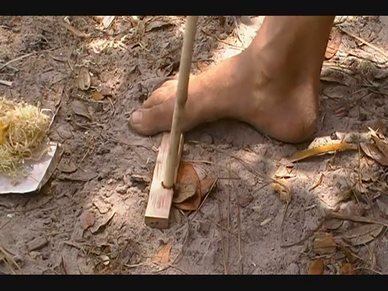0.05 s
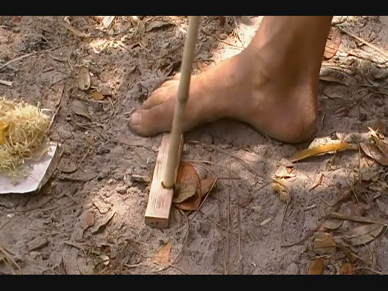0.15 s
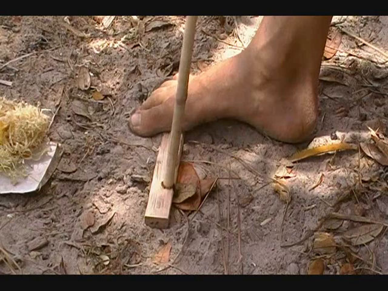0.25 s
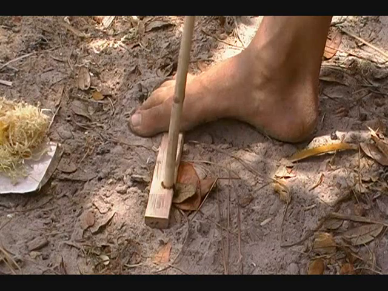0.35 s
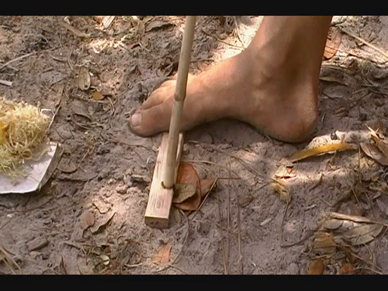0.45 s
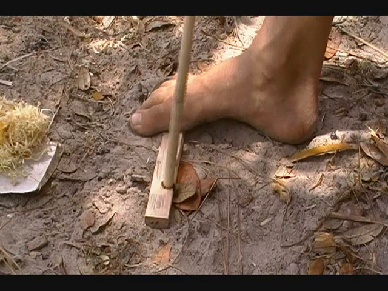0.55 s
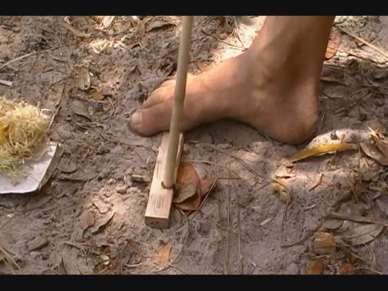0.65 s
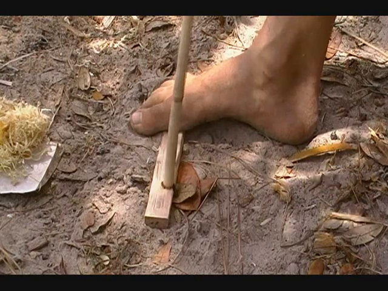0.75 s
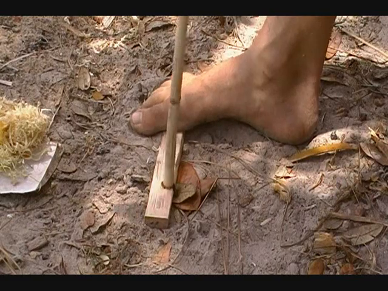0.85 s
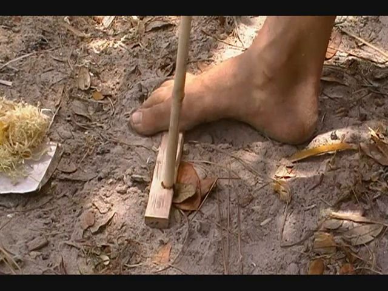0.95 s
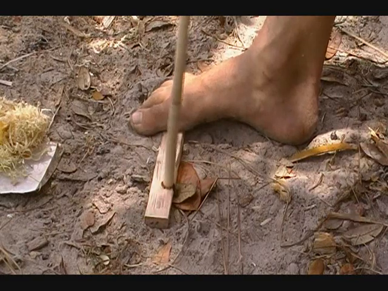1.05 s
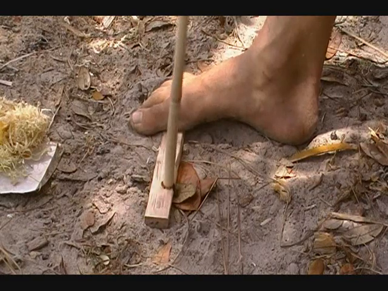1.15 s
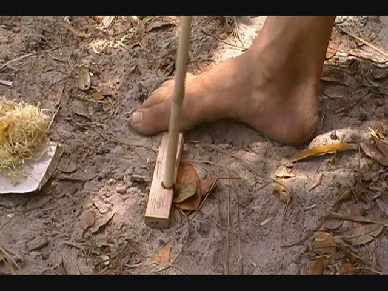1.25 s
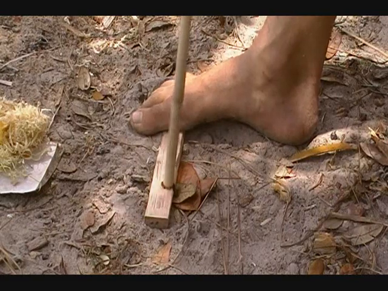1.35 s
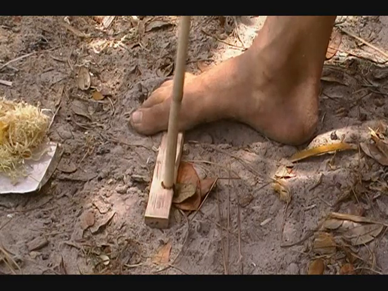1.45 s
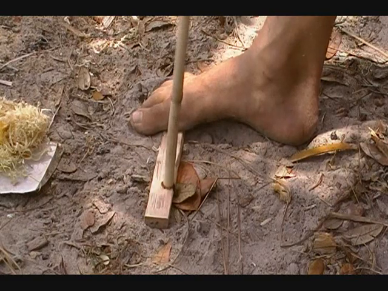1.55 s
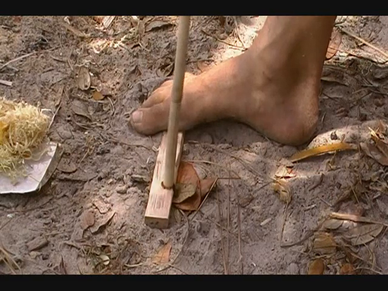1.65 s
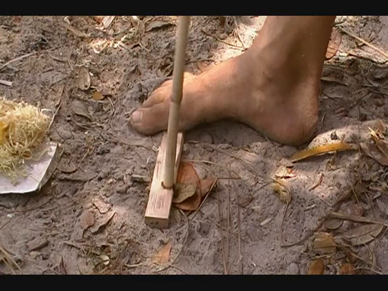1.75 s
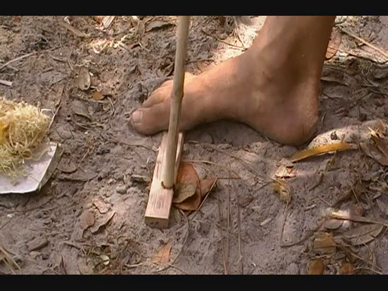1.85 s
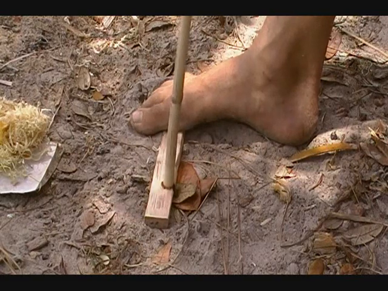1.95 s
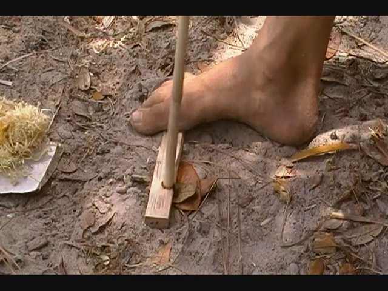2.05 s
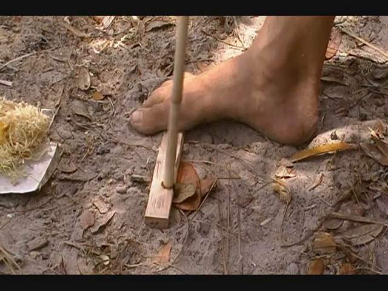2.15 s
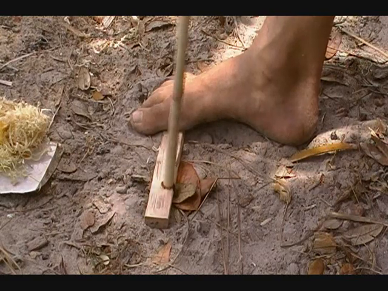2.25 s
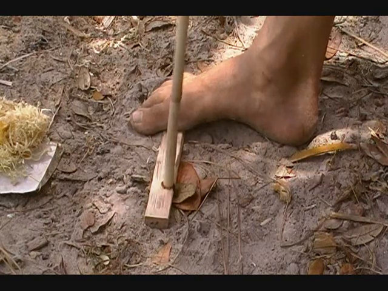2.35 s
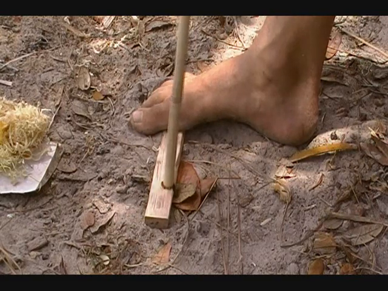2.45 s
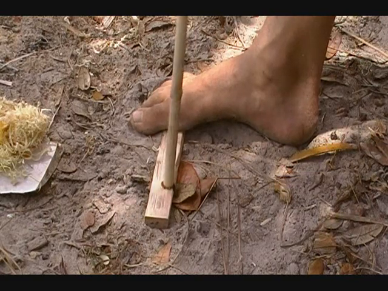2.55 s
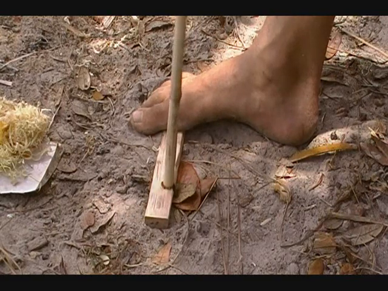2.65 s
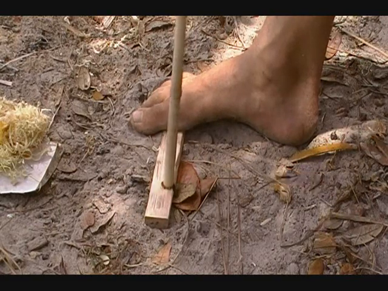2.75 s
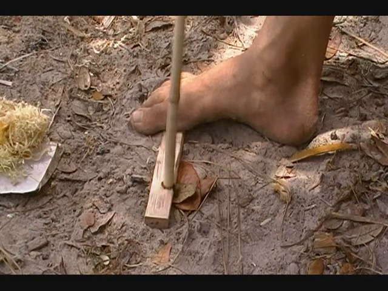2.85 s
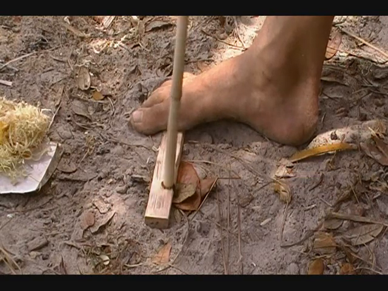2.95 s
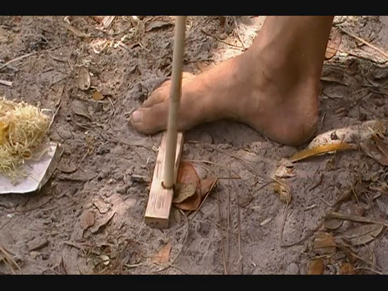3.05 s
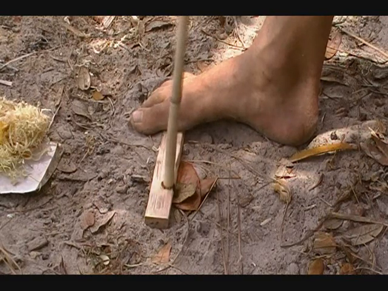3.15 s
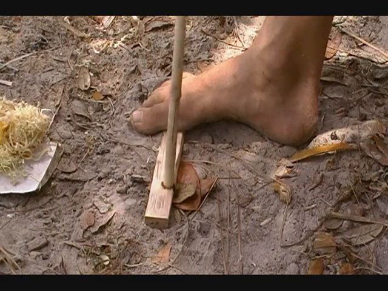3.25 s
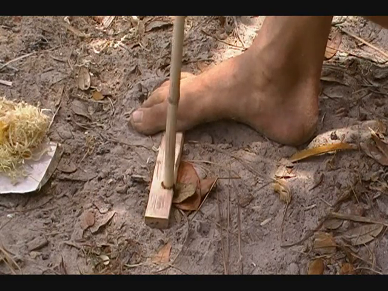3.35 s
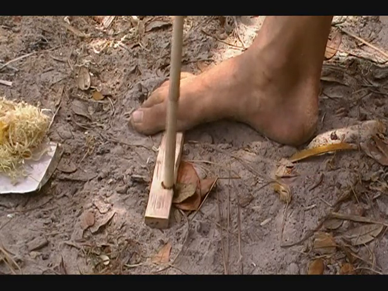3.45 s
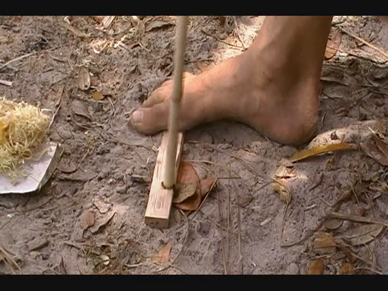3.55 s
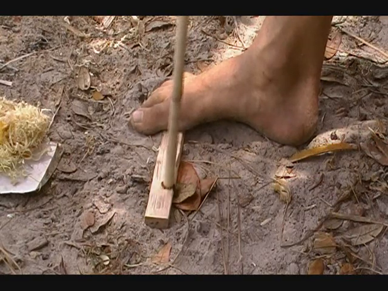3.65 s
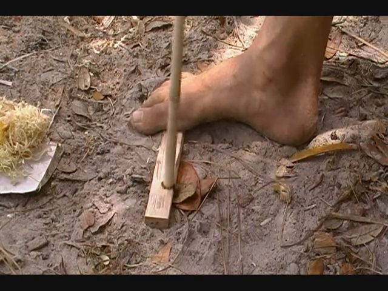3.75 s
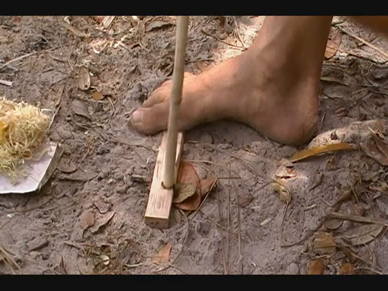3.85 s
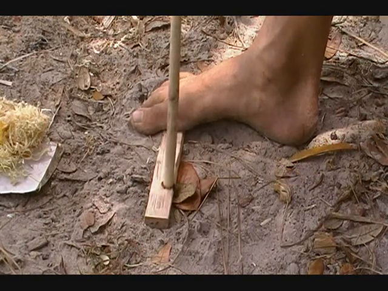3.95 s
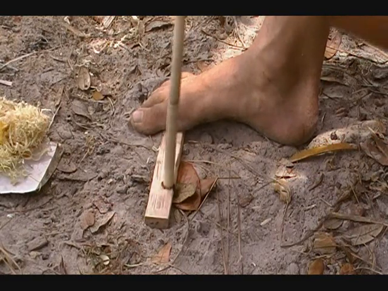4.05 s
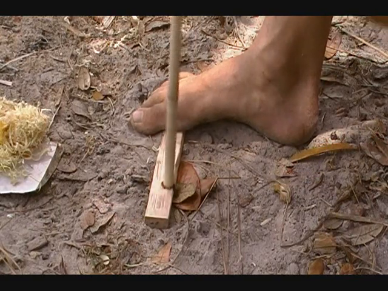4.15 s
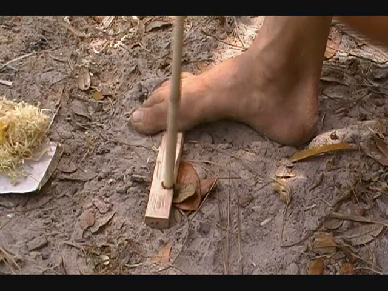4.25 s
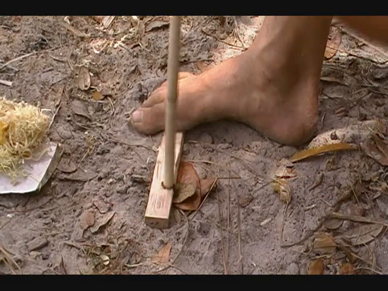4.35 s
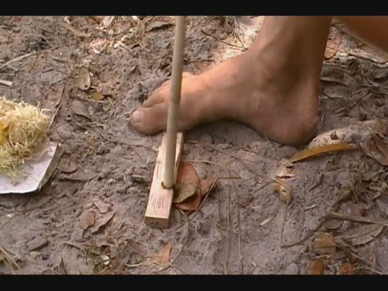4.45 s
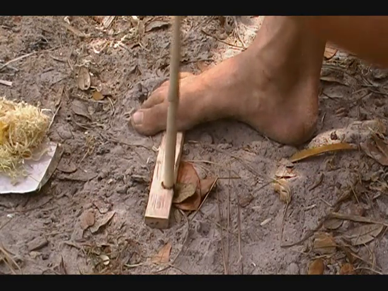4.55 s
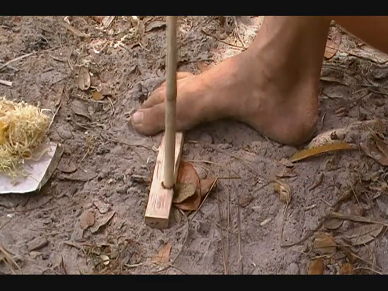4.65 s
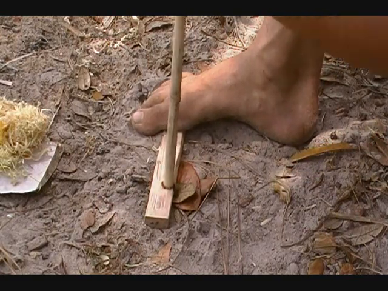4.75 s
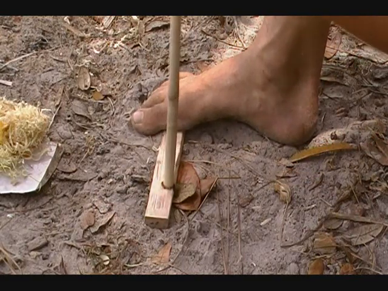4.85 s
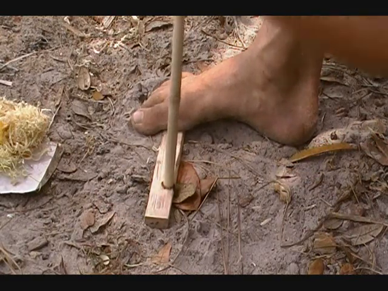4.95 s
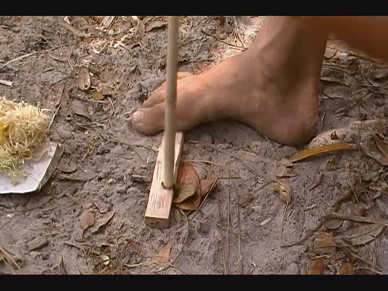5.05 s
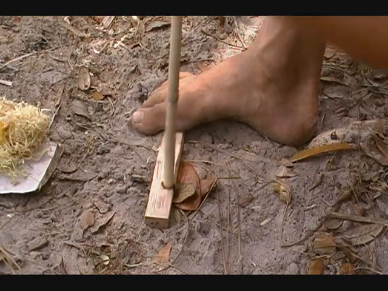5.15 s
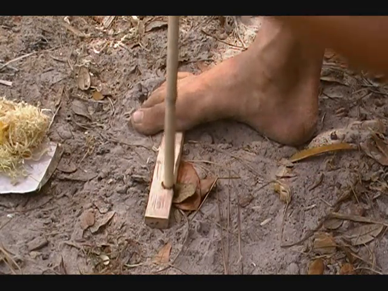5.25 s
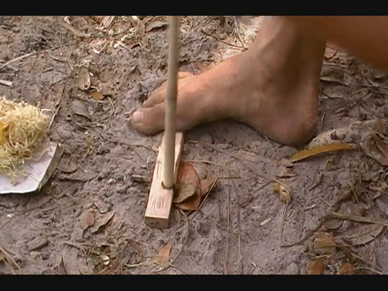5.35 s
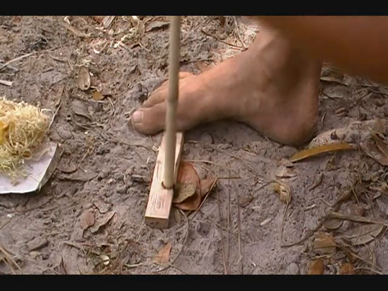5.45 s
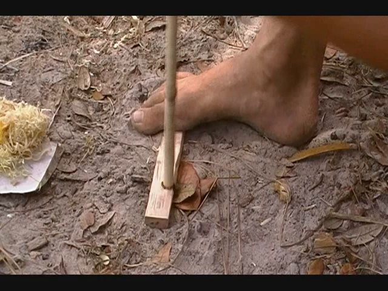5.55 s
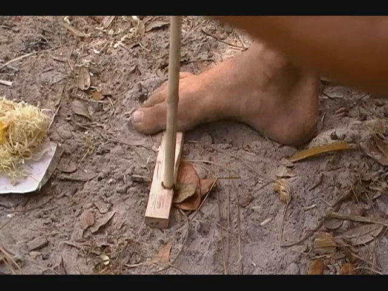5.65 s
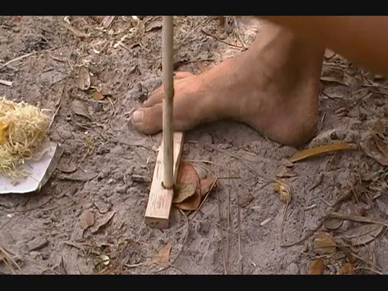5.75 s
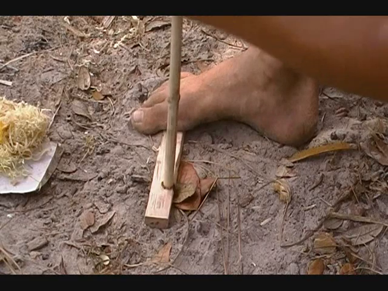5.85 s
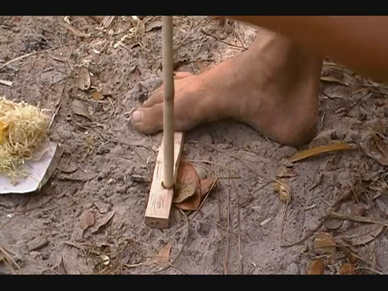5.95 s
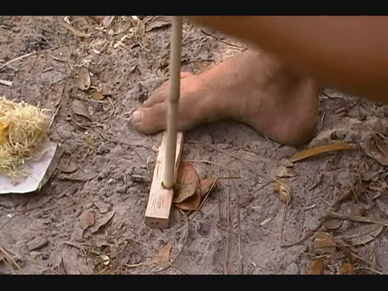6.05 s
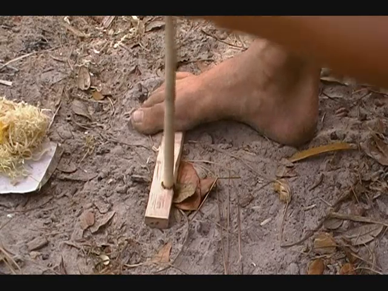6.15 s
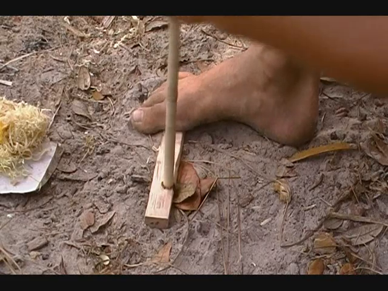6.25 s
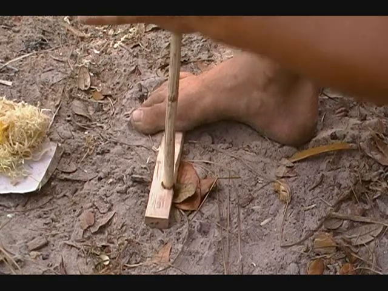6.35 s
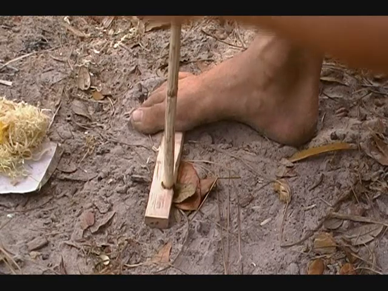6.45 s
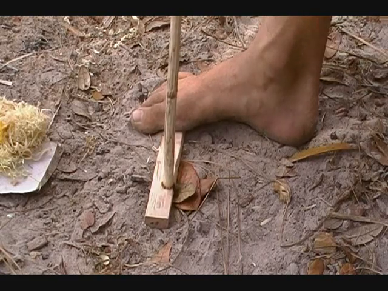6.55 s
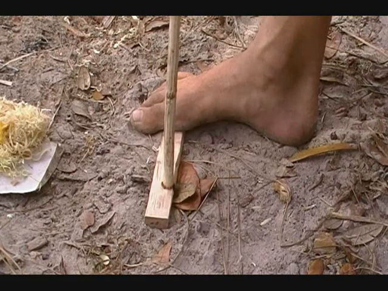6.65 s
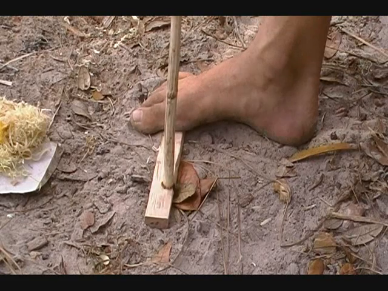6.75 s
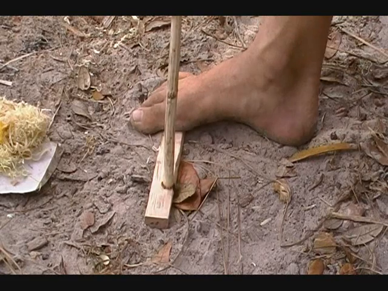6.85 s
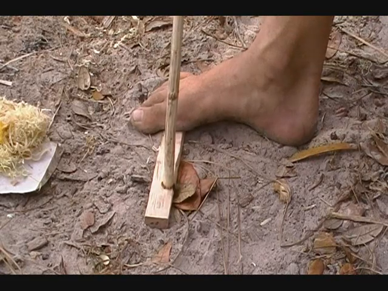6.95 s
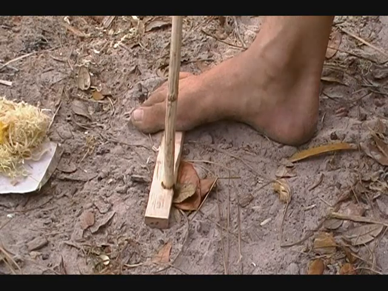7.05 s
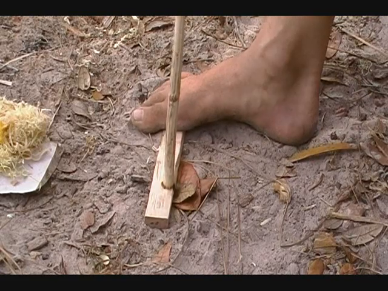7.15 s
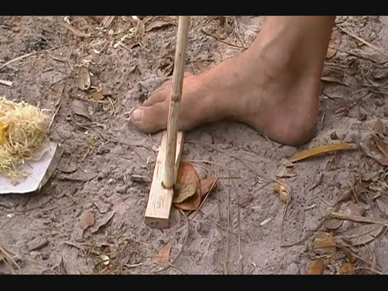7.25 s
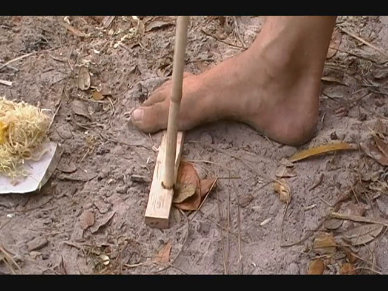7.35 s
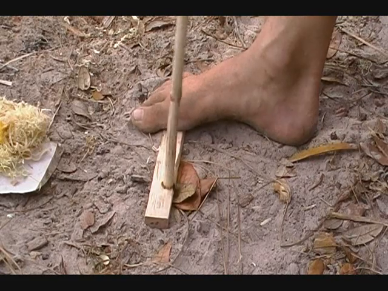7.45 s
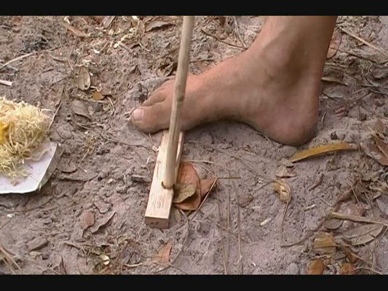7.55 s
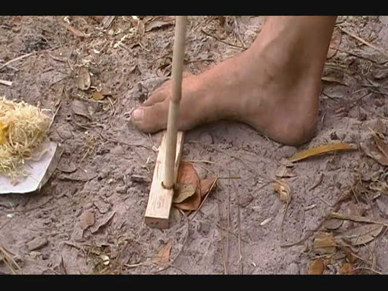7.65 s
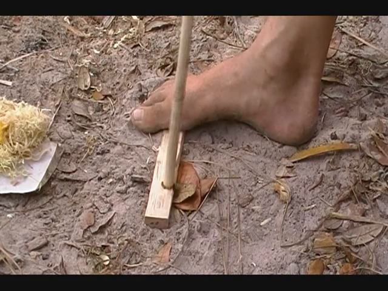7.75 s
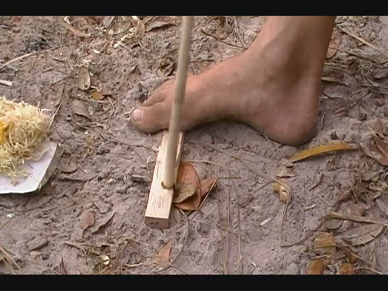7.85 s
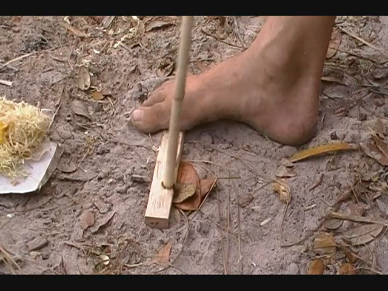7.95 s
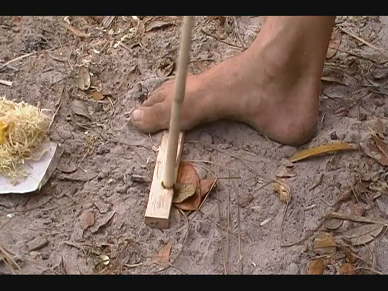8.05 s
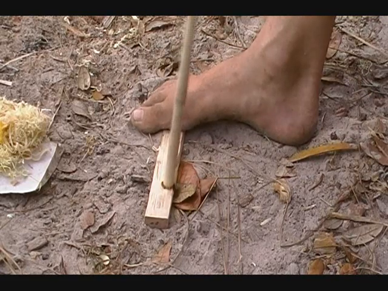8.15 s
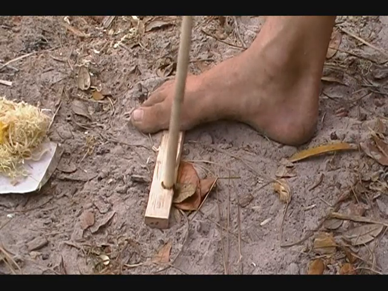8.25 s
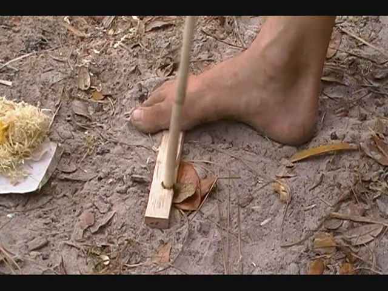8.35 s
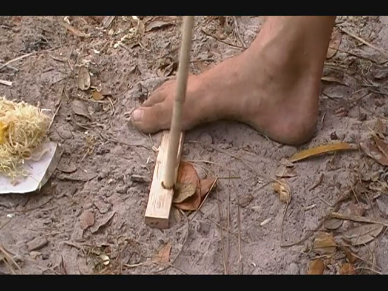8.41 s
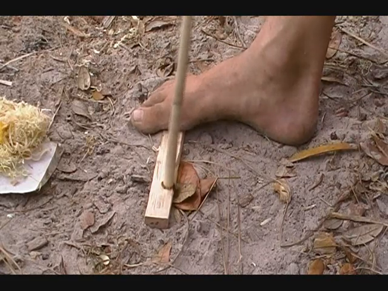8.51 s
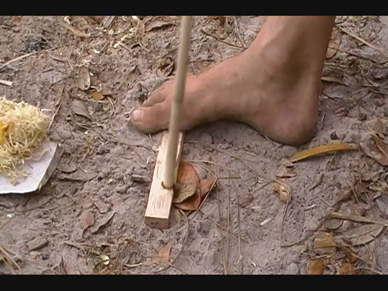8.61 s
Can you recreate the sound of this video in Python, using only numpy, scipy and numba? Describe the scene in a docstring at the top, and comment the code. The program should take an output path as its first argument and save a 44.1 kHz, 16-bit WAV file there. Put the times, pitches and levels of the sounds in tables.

```python
"""A hand drill: palms roll a wooden spindle to and fro in a fireboard socket, about nine strokes a second.
Each stroke is shaped noise from snapping fibres, with a jerk at some break-aways; a pitched chatter peaks with
the pressure, and board modes ring. The hands pause once to climb the spindle; slips squeak and tick.
A motor vehicle nears, revs up and passes: harmonics of its firing rate, exhaust and tyre noise.
Behind it: faint road noise, air, distant rumble and a thin whine, all filtered noise."""
import sys
import numpy as np
from scipy import signal
from scipy.fft import rfft, irfft
from scipy.io import wavfile
from scipy.ndimage import uniform_filter1d
from numba import njit

SR = 44100
rng = np.random.default_rng(int(sys.argv[2]) if len(sys.argv) > 2 else 0)


def master(y):
    """Save y as 16-bit WAV."""
    cut = np.clip(np.atleast_2d(y).T, -1, 1)
    pcm = np.round(cut * 32767)  # scale
    wavfile.write(sys.argv[1], SR, pcm.astype(np.int16))


N = 382788
TIME_S = np.arange(N) / SR
BINS_HZ = np.maximum(np.arange(N // 2 + 1) * SR / N, 1)

# Background spectrum: f/Hz, level/dB
OUTDOOR_SPECTRUM = [(20, -18), (45, 2.5), (100, -3), (170, -2), (260, -6.5), (400, -15), (650, -14),
                    (950, -7.5), (1500, -10.5), (2500, -17.5), (5000, -23), (10000, -32), (12000, -31),
                    (16000, -35)]
# Distant traffic: t/s, level/dB
FAR_ROAD_LEVEL = [(0, -58), (1, -61.5), (7.3, -64), (8.68, -47.5)]
# Tyre noise spectrum: f/Hz, level/dB
TYRE_SPECTRUM = [(100, 6), (250, -5.5), (400, 3), (600, 0.5), (950, 0.5), (1700, -3), (3000, -6),
                 (4200, -9), (6000, -21), (10000, -23), (15000, -56)]
# Exhaust spectrum: f/Hz, level/dB
EXHAUST_SPECTRUM = [(40, -11.5), (80, -6), (122, 0.5), (140, 2), (155, -3), (172, -1.5), (205, -12.5),
                    (300, -15), (400, -29), (700, -57.5)]
# Left-right likeness, background and vehicle noise: f/Hz, correlation/1
FAR_LIKENESS = [(25, 0.67), (70, 0.84), (130, 0.76), (250, 0.79), (500, 0.82), (1000, 0.78), (3000, 0.11),
                (10000, 0.1)]
# Engine speed, sharp rev-up at 5 s: t/s, firing rate/Hz
ENGINE_SPEED = [(1.3, 63.97), (3.3, 66.65), (4.92, 69.5), (5.2, 102.2), (5.5, 106), (6.2, 125.1),
                (6.4, 129.1), (6.57, 129.9), (6.78, 124.8), (7.25, 110.6), (8.1, 92.6), (8.68, 94.4)]
# Exhaust boom at ROAD_M: t/s, firing tone/dB, octave/dB
EXHAUST_BOOM = [(1.3, -41, -50), (1.7, -25, -31), (3, -28.5, -39.5), (3.6, -23.5, -29.5),
                (4.93, -25.5, -32), (5.06, -34, -29), (5.22, -33, -42), (5.55, -29, -54), (6.2, -28, -51.5),
                (6.4, -19.5, -39.5), (6.57, -25.5, -45), (6.78, -18, -35.5), (7, -25.5, -45),
                (7.25, -29.5, -49), (7.5, -25.5, -53), (7.75, -26.5, -48), (7.95, -40, -39),
                (8.68, -34, -29)]
# Unequal cylinders: multiple of the engine cycle rate/1, relative level/dB
CYLINDER_LINES = [(4, -12), (5, -16), (7, -6.5), (8, -6), (9, -1), (10, -6), (13, -6.5), (14, -8.5),
                  (15, -6.5), (16, -9.5)]
# Spells of drilling, hands climbing between: from t/s, to t/s, first stroke,
# place of hardest press in a push/share of stroke, same in a pull/share of stroke
DRILLING_SPELLS = [(0, 6.533, "push", 0.25, 0.56), (7.5, 8.655, "pull", 0.41, 0.43)]
# Palm rolls: start t/s, relative grinding level/dB, break-away jerk/share of full grinding (<= 0: none)
PALM_STROKES = [(0.027, -36, 1.2), (0.158, -38, 0.9), (0.305, -37, .5), (0.46, -39, 0.4), (0.602, -38, 0.6),
                (0.73, -37, 0.2), (0.857, -36.5, .7), (0.984, -36.5, .5), (1.113, -35.5, 1.4),
                (1.227, -35.5, 0.7), (1.344, -35.5, 1.1), (1.455, -35, 0.6), (1.57, -35, 1.5),
                (1.679, -35, 1), (1.79, -34.5, 1.6), (1.895, -36, 1), (2.003, -34.5, 2.2),
                (2.113, -36.5, 0.8), (2.227, -35, 1.3), (2.34, -36, 0.5), (2.458, -36, 1.1),
                (2.574, -35.5, 0.9), (2.684, -35, 1.1), (2.796, -35, 0.5), (2.911, -35, 0.5),
                (3.03, -34.5, .6), (3.14, -34.5, 0.5), (3.253, -33.5, .6), (3.363, -36, 0.7),
                (3.48, -35, 1.2), (3.592, -35, -0.1), (3.717, -35.5, 1), (3.822, -35.5, -0.5),
                (3.947, -34, 0.3), (4.065, -36, .3), (4.184, -34.5, 0.7), (4.287, -36, -1),
                (4.413, -33, .5), (4.511, -36, -1), (4.638, -37, 1.7), (4.744, -35, -1), (4.869, -35.5, .5),
                (4.985, -36, 0.3), (5.095, -36, 0.6), (5.204, -35, -0.1), (5.314, -36, 0), (5.433, -35, 0),
                (5.535, -36.5, 0.5), (5.647, -36, -0.2), (5.75, -38, 0.2), (5.858, -36.5, -1.1),
                (5.968, -37.5, .1), (6.085, -36.5, 0), (6.185, -39.5, 0), (6.309, -35.5, 0),
                (6.404, -44, 0), (7.531, -37.5, -1.1), (7.683, -31.5, 0.3), (7.796, -32, 0.7),
                (7.901, -31.5, 0.5), (8.012, -33, 1), (8.125, -33, 0.8), (8.237, -33.5, 0.5),
                (8.345, -34.5, .6), (8.455, -36.5, 0.6), (8.566, -36.5, -0.5)]
# Bearing down: t/s, chatter re grinding/dB, chatter pitch at hardest press/Hz
TIP_CHATTER = [(0.1, -12, 1950), (0.4, -22, 2200), (0.9, -17, 2290), (1.15, -9.5, 2400), (1.5, -7, 2840),
               (2.05, -8, 2650), (2.35, -5.5, 3280), (4.4, -4.5, 3220), (4.9, -2.5, 2980),
               (6.15, -2.5, 3000), (6.47, -11.5, 2280), (7.6, -16.5, 3750), (7.73, -8, 3830),
               (7.85, -11, 3140), (7.95, -8.5, 2380), (8.6, -6.5, 2021)]
# Socket wear: t/s, treble shelf/dB, board ring/dB
SOCKET_WEAR = [(0, -2, -8), (1, -0.5, -11), (2, 0.5, -7), (2.8, 1, -4), (3.4, -2.5, -3.5), (5, -9, -4),
               (5.8, -8, -1.5), (6.5, -10.5, -5), (8.1, -6.5, -11), (8.68, 0.5, -1.5)]
# Grinding spectrum: f/Hz, level/dB
GRIT_SPECTRUM = [(400, -14.5), (930, -12.5), (1500, -10.5), (2100, -7), (2650, -8), (4000, -11),
                 (5600, 0.5), (7000, 0), (8400, 4), (10300, 2.5), (12000, -2), (13500, -6), (15000, -12),
                 (16000, -34)]
# Spindle and board modes: f/Hz, width/Hz, level/dB
BOARD_MODES = [(2344, 140, 2), (2910, 50, -5.5), (3330, 160, -0.5), (3903, 296, 10), (4520, 540, 12),
               (5370, 1670, 8.5)]
# Spindle slips and knocks: t/s, f/Hz, width per filter pass/Hz, length/s, level before envelope/dB
SPINDLE_SLIPS = [(0.692, 5000, 3000, 0.022, -39), (4.317, 3200, 250, 0.012, -33.5),
                 (5.005, 2930, 500, 0.01, -36), (5.422, 3220, 1500, 0.007, -45),
                 (7.084, 6990, 9050, 0.084, -60.5), (7.146, 3000, 6000, 0.0057, -49),
                 (7.424, 2605, 1210, 0.028, -46.5), (7.426, 6520, 11050, 0.026, -53),
                 (7.902, 4600, 4000, 0.013, -43), (8.125, 4200, 1800, .018, -40),
                 (8.346, 4430, 1400, 0.038, -35.5), (8.567, 4130, 1500, .04, -36)]
# Left-right likeness of the drill: f/Hz, correlation/1
NEAR_LIKENESS = [(1000, 0.27), (2500, 0.87), (5000, 0.86), (8000, 0.6), (13000, 0.94)]

PASSES_S, SPEED_M_S, ROAD_M = 6.46, 16, 6.46  # closest moment, speed, closest distance
THROB_DB, TYRE_DB = -33.5, -43  # at ROAD_M, abeam
THROB_REAR_DB, TYRE_REAR_DB = 1.3, 1.2  # added behind the vehicle, taken off ahead of it
REST_S, OVERLAP_S = 0.0087, 0.0035  # stuck tip rests before a reversal; free tip rubs on past it
STICKS_FROM = 0.14  # jerk at which the tip counts as fully stuck
LET_GO_S = 0.0061  # rise time of the break-away
TOP_HZ = 15850


def undb(db):
    """Decibels to gain."""
    return 10 ** (np.asarray(db) / 20)


def unit(x):
    """Scale to rms 1."""
    return x / np.sqrt(np.mean(x ** 2) + 1e-18)


def curves(table):
    """Columns of a (t/s, ...) table, interpolated to every sample."""
    t_s, *columns = np.transpose(table)
    return [np.interp(TIME_S, t_s, column) for column in columns]


def at(points, hz):
    """Read (f/Hz, value) points on a log-frequency axis."""
    f_hz, value = np.transpose(points)
    return np.interp(np.log(hz), np.log(f_hz), value)


def colour(x, points):
    """Filter by (f/Hz, level/dB) points, then scale to rms 1."""
    return unit(irfft(rfft(x) * undb(at(points, BINS_HZ)), N))


def walk(rate_hz):
    """Slow chance: random levels held 1 / rate_hz and smoothed twice; spread near 1."""
    hold = max(int(SR / rate_hz), 1)
    steps = np.repeat(rng.standard_normal(N // hold + 1), hold)
    return 1.68 * uniform_filter1d(uniform_filter1d(steps, hold), hold)[:N]


def stereo(pair, likeness):
    """Mix two unrelated sounds into left and right, correlated per frequency."""
    c = np.clip(at(likeness, BINS_HZ), 0, .999)
    mid, side = irfft(rfft(pair) * np.sqrt([(1 + c) / 2, (1 - c) / 2]), N)
    return np.array([mid + side, mid - side])


@njit
def svf(x, hz, width_hz):
    """State-variable band-pass with a moving centre, gain 1 there."""
    y, band, low = np.empty(len(x)), 0., 0.
    for i in range(len(x)):
        g, k = np.tan(np.pi * hz[i] / SR), width_hz / hz[i]
        v = (band + g * (x[i] - low)) / (1 + g * (g + k))
        band, low, y[i] = 2 * v - band, low + 2 * g * v, k * v
    return y


def resonate(pair, hz, width_hz):
    """Both channels through one resonance."""
    centre_hz = np.clip(hz + np.zeros(pair.shape[1]), 20, 18000)
    return np.array([svf(x, centre_hz, float(width_hz)) for x in pair])


def resonate_twice(pair, hz, width_hz):
    """Two equal resonances in series: steeper skirts."""
    return resonate(resonate(pair, hz, width_hz), hz, width_hz)


def outdoors(air_db=-50, whine_hz=7890, whine_width_hz=140, whine_db=-72):
    """Distant rumble and air as shaped noise that swells gently, plus a thin high whine."""
    swell_db = .6 * walk(3)
    air = colour(rng.standard_normal((2, N)), OUTDOOR_SPECTRUM) * undb(air_db + swell_db)
    whine = unit(resonate_twice(rng.standard_normal((2, N)), whine_hz, whine_width_hz))
    return stereo(air + undb(whine_db) * whine, FAR_LIKENESS)


def far_road():
    """Distant traffic: tyre-coloured noise of varying level."""
    road_db, = curves(FAR_ROAD_LEVEL)
    noise = colour(rng.standard_normal((2, N)), TYRE_SPECTRUM)
    return stereo(noise * undb(road_db), FAR_LIKENESS)


def drive_past():
    """Straight road: 1/distance level/dB, and aspect from -1 (coming) to 1 (going)."""
    along_m = SPEED_M_S * (TIME_S - PASSES_S)
    distance_m = np.hypot(along_m, ROAD_M)
    return 20 * np.log10(ROAD_M / distance_m), along_m / distance_m


def vehicle(third_db=-10, rumble_db=-1, waver_db=1.9, flutter_db=1.3, cylinders=6):
    """Six-cylinder engine: firing harmonics, unequal-cylinder lines, exhaust rumble; and tyres."""
    firing_hz, = curves(ENGINE_SPEED)
    firing_db, octave_db = curves(EXHAUST_BOOM)
    distance_db, aspect = drive_past()
    throb_db = THROB_DB + THROB_REAR_DB * aspect
    road_db = TYRE_DB + TYRE_REAR_DB * aspect
    phase = 2 * np.pi * np.cumsum(firing_hz * (1 + 0.0017 * walk(25))) / SR
    third_gain = undb(third_db) * (firing_hz / firing_hz.max()) ** 3  # harder at high revs
    overtones = np.sin(2 * phase) + third_gain * np.sin(3 * phase)
    tone = undb(firing_db + flutter_db * walk(14)) * np.sin(phase)
    tone = tone + undb(octave_db + waver_db * walk(9)) * overtones
    tone = tone * np.clip(TIME_S / 1.3, 0, 1) ** 2  # comes into earshot
    for order, db in CYLINDER_LINES:
        share = round(order) / cylinders
        line_db = throb_db + db + at(EXHAUST_SPECTRUM, share * firing_hz)
        gain = undb(line_db + waver_db * walk(8.8))
        tone = tone + gain * np.sin(share * phase + 2 * np.pi * rng.random())
    rumble = colour(rng.standard_normal((2, N)), EXHAUST_SPECTRUM) * undb(road_db + rumble_db)
    bumps_db = 1.1 * walk(12)
    tyres = colour(rng.standard_normal((2, N)), TYRE_SPECTRUM) * undb(road_db + bumps_db)
    return (np.sqrt(2) * tone + stereo(rumble + tyres, FAR_LIKENESS)) * undb(distance_db)


def surroundings(pair, wet_db=-18, t60_s=0.093):
    """Ground, legs and foliage scatter back a faint, short tail: decaying noise, convolved."""
    t_s = TIME_S[:SR // 3]
    echoes = rng.standard_normal((2, len(t_s))) * undb(-60 * t_s / t60_s)
    echoes = echoes / np.sqrt(np.sum(echoes ** 2, axis=1, keepdims=True))
    return pair + undb(wet_db) * signal.fftconvolve(pair, echoes, axes=1)[:, :N]


def small_slips():
    """Brief squeaks and ticks as the tip shifts in its socket: enveloped resonant noise."""
    out = np.zeros((2, N))
    noise = rng.standard_normal((2, N))
    for start_s, hz, width_hz, length_s, db in SPINDLE_SLIPS:
        span = slice(int(start_s * SR), int((start_s + length_s) * SR))
        ring = unit(resonate_twice(noise[:, span], hz, width_hz))
        envelope = np.sin(np.pi * np.linspace(0, 1, ring.shape[1]) ** 0.54)
        out[:, span] += undb(db) * ring * envelope
    return out


def grains(rate_hz, scatter_db):
    """Wood fibres snapping: dense clicks of very unequal size."""
    hit = rng.random(N) < rate_hz / SR
    size = undb(scatter_db * np.minimum(rng.exponential(size=N), 5))
    return unit(hit * size * rng.standard_normal((2, N)))


def squeaklets(rate_hz=420, low_hz=2700, high_hz=11000, ring_s=0.0058, scatter_db=3):
    """Single fibres catch and sing for a few milliseconds, each at its own pitch."""
    out, t_s = np.zeros(N + 1024), TIME_S[:1024]
    count = int(rate_hz * N / SR)
    for when, pitch, luck in rng.random((count, 3)):
        hz = low_hz * (high_hz / low_hz) ** (pitch ** 1.5)
        start = int(when * N)
        gain = undb(-scatter_db * np.log(luck + 0.027))
        envelope = t_s * np.exp(-2 * t_s / ring_s)
        out[start:start + len(t_s)] += gain * np.sin(2 * np.pi * hz * t_s) * envelope
    return unit(out[:N])


def clumpy(x, tilt_db, clump_db, count=13):
    """Dust clumps independently in each band; socket wear moves a treble shelf around 6.5 kHz."""
    centres_hz = np.geomspace(1800, 14000, count)
    spectrum, out = rfft(x), 0
    for hz, pick in zip(centres_hz, np.eye(count)):
        band = irfft(spectrum * np.interp(BINS_HZ, centres_hz, pick), N)
        shelf_db = tilt_db / (1 + (6500 / hz) ** 6)
        out = out + band * undb(shelf_db + clump_db * walk(90))
    return out


def board(pair):
    """The wood rings in its modes; neighbouring modes swing in opposite senses."""
    out = 0
    for k, (hz, width_hz, db) in enumerate(BOARD_MODES):
        out = out + (-1) ** k * undb(db) * resonate(pair, hz, width_hz)
    return unit(out)


def strokes():
    """Alternate push and pull to the next reversal: start/s, stop/s, level/dB, jerk, hardest press."""
    for begin_s, end_s, first, push_peak, pull_peak in DRILLING_SPELLS:
        rows = [row for row in PALM_STROKES if begin_s <= row[0] < end_s]
        stops_s = [start_s - np.interp(jerk, [0, STICKS_FROM], [-OVERLAP_S, REST_S])
                   for start_s, _, jerk in rows[1:]] + [end_s]
        peaks = (push_peak, pull_peak) if first == "push" else (pull_peak, push_peak)
        for k, ((start_s, db, jerk), stop_s) in enumerate(zip(rows, stops_s)):
            yield start_s, stop_s, db, max(jerk, 0), peaks[k % 2]


def hands(swell=1.26, chatter_span=0.17, chatter_rise=0.22):
    """Palm speed sets the grinding; pressure sets chatter strength and pitch/Hz."""
    grind, chatter, pitch_hz = np.zeros(N), np.zeros(N), np.full(N, 3000.)
    bearing_down = np.array(curves(TIP_CHATTER))
    for start_s, stop_s, db, jerk, peak in strokes():
        span = slice(int(start_s * SR), min(int(stop_s * SR), N))
        chatter_db, hz = bearing_down[:, (span.start + span.stop) // 2]
        u = np.clip((TIME_S[span] - start_s) / (stop_s - start_s), 0, 1)  # share of stroke
        speed = np.abs(np.sin(np.pi * u))
        # stuck tip breaks loose, then follows the palms
        let_go = jerk * np.clip((TIME_S[span] - start_s) / LET_GO_S, 0, 1) * (1 - u) ** 2
        grind[span] += undb(db) * unit(speed ** swell + let_go)
        # strongest and lowest at the hardest press
        press = np.exp(-.5 * ((u - peak) / chatter_span) ** 2)
        chatter[span] += undb(db + chatter_db) * press * np.minimum(2 * speed, 1)
        pitch_hz[span] = hz * (1 + chatter_rise * (1 - press))
    return grind, chatter, pitch_hz


def spindle(grind_db=-4.0, chatter_db=-1, overtone=1.16, overtone_db=-4, coupling_db=3.0,
            stutter_db=2.0, patchy_db=2, width_hz=850):
    """Dust grinds in the socket, the tip chatters in sliding resonances, both ring the board."""
    grind, chatter, pitch_hz = hands()
    tilt_db, ring_db = curves(SOCKET_WEAR)
    dust = colour(grains(rate_hz=16000, scatter_db=1.9), GRIT_SPECTRUM)
    dust = dust + undb(-8) * np.array([squeaklets(), squeaklets()])
    dust = clumpy(dust, tilt_db, clump_db=1.8)
    ring = board(grains(rate_hz=6000, scatter_db=0.5)) * undb(ring_db + patchy_db * walk(90))
    scrape = (dust + ring) * grind * undb(grind_db)
    slips = grains(rate_hz=3500, scatter_db=1.15)
    low = unit(resonate_twice(slips, pitch_hz, width_hz))
    high = unit(resonate_twice(slips, pitch_hz * overtone, 2 * width_hz))
    tip = low + undb(overtone_db) * high
    coupled = unit(tip + undb(coupling_db + ring_db / 2) * board(tip))
    rasp = coupled * chatter * undb(chatter_db + stutter_db * walk(160))
    return surroundings(stereo(scrape + rasp + small_slips(), NEAR_LIKENESS))


def scene(balance_db=0.03):
    """Drill close by, road further off; balance_db is left over right."""
    side_db = np.array([[balance_db], [-balance_db]]) / 2
    return (outdoors() + far_road() + vehicle() + spindle()) * undb(side_db)


def record(dry):
    """The recorder cuts the top: steep elliptic low-pass at TOP_HZ."""
    return signal.sosfilt(signal.ellip(10, .2, 70, TOP_HZ, fs=SR, output="sos"), dry)


dry = scene()
out = record(dry)
master(out)
```